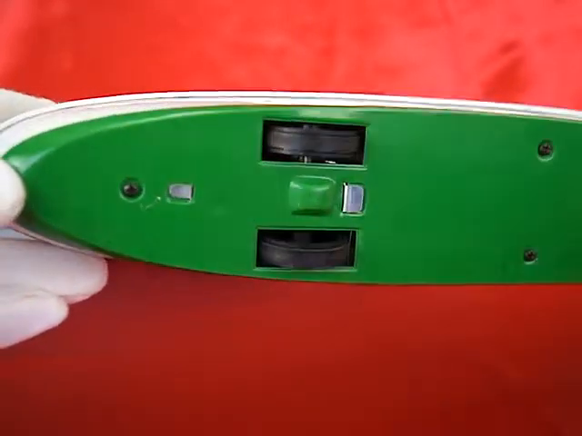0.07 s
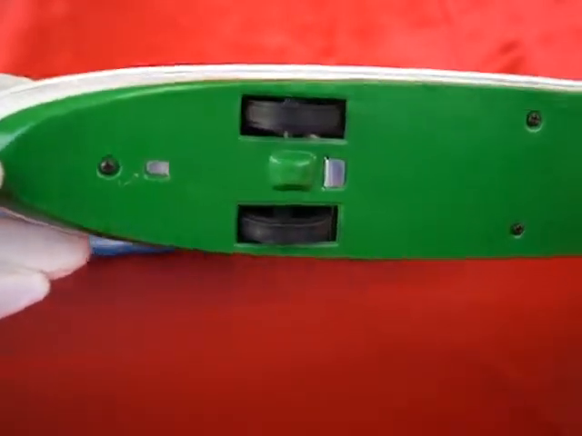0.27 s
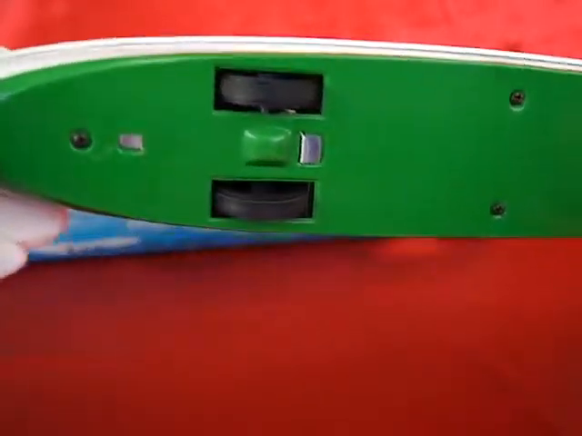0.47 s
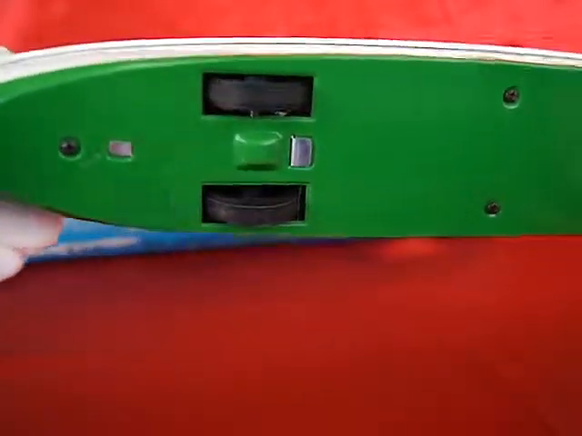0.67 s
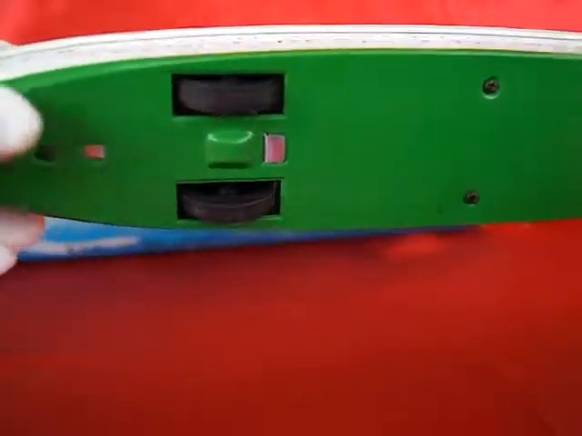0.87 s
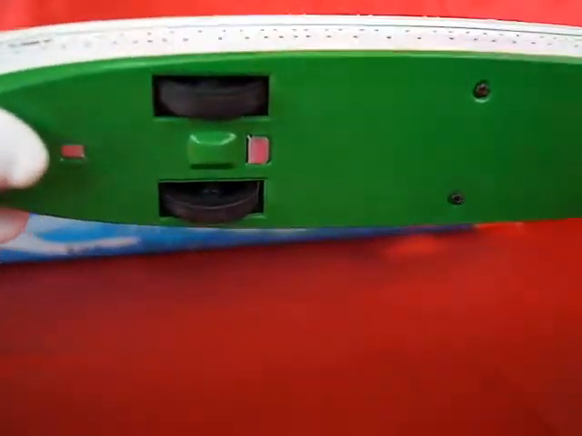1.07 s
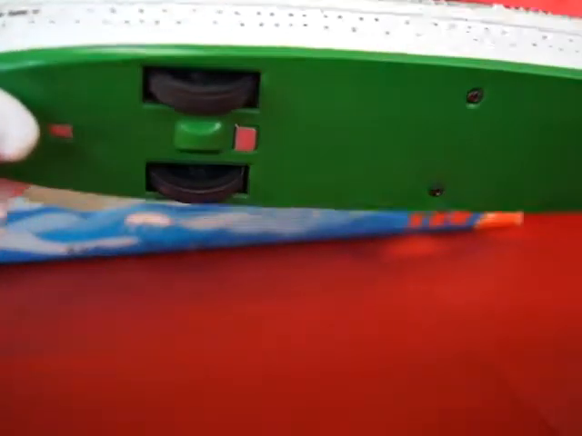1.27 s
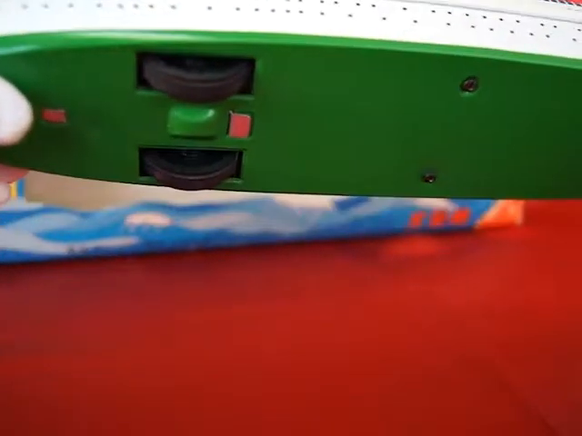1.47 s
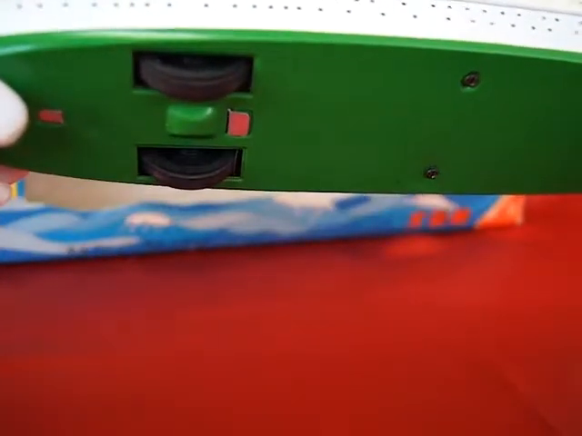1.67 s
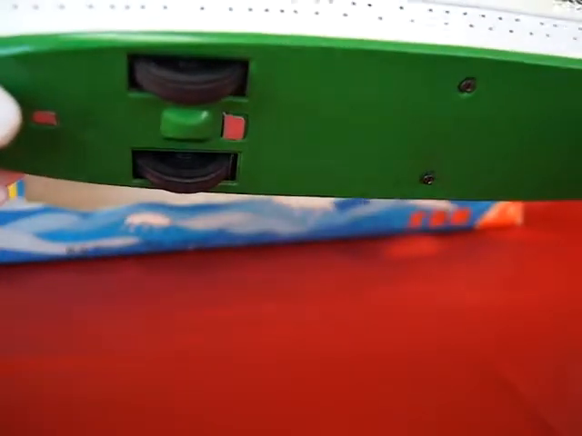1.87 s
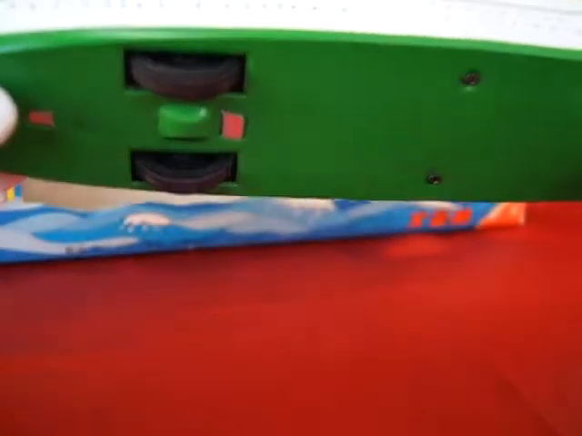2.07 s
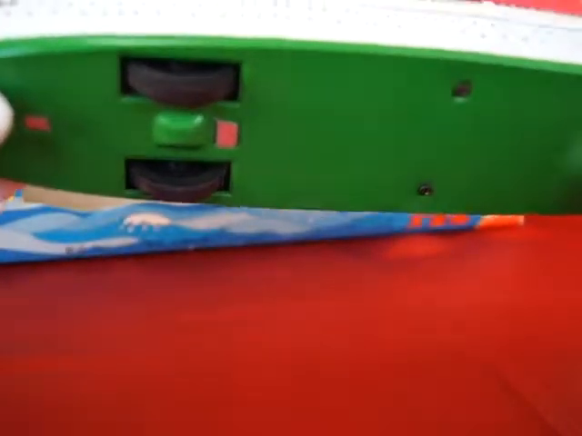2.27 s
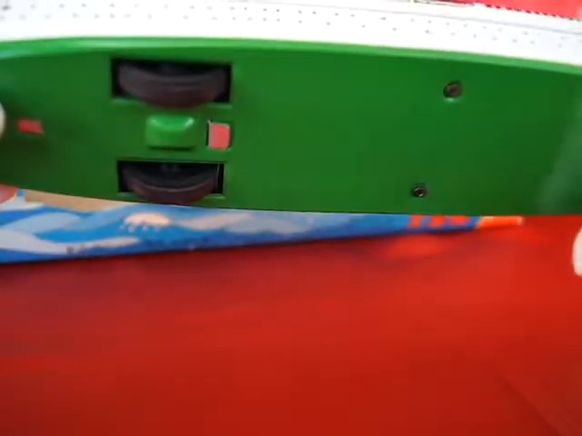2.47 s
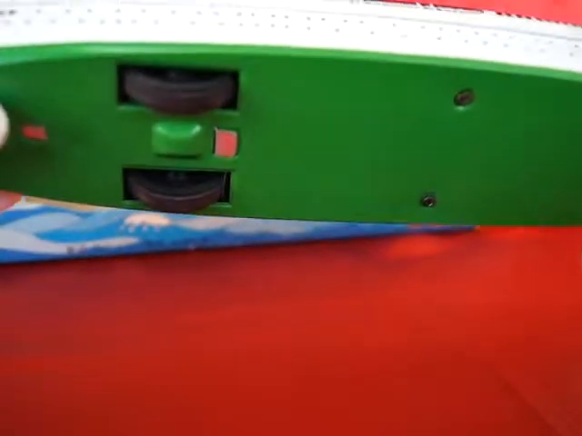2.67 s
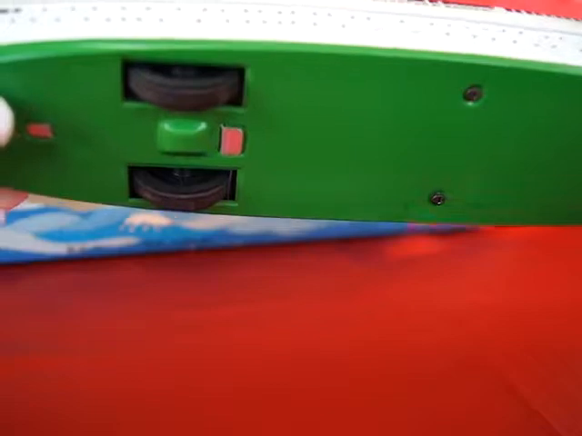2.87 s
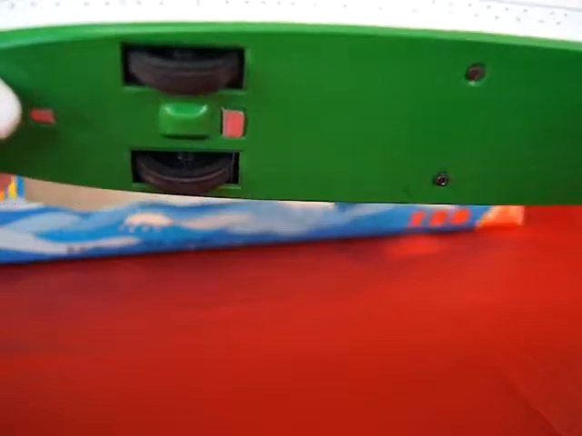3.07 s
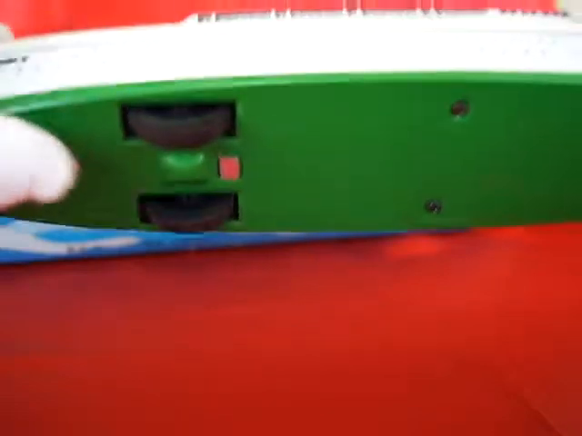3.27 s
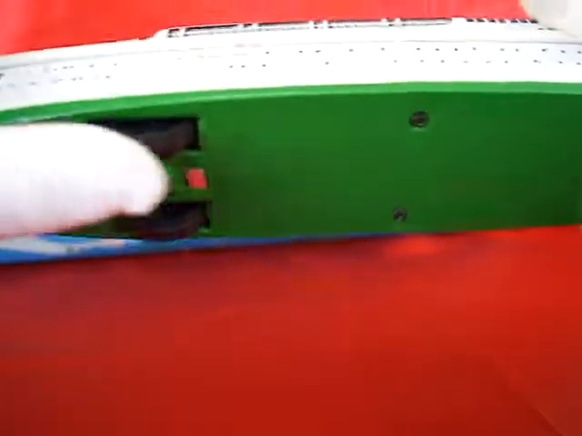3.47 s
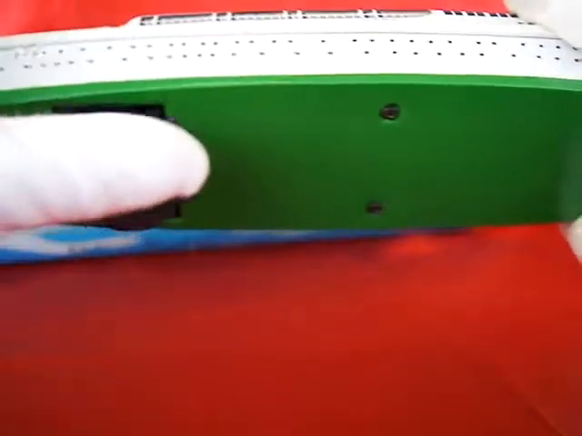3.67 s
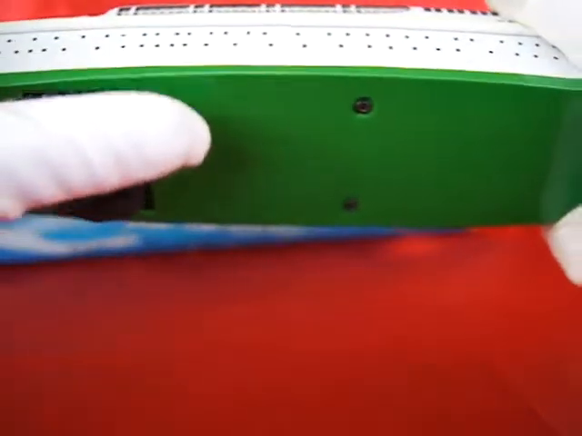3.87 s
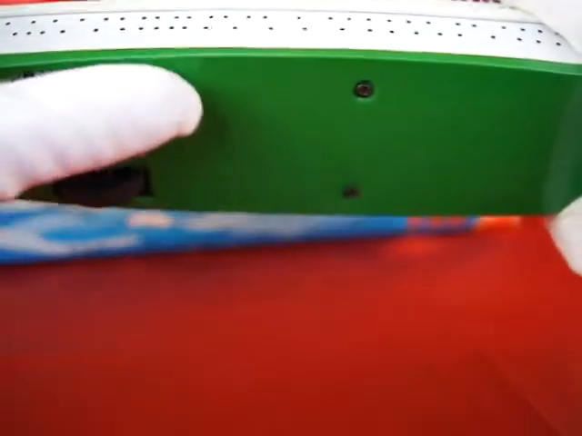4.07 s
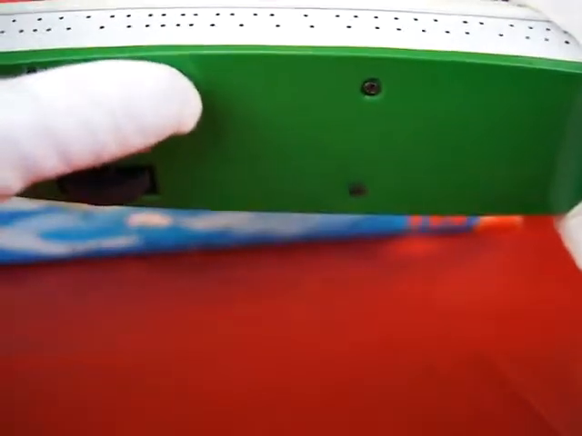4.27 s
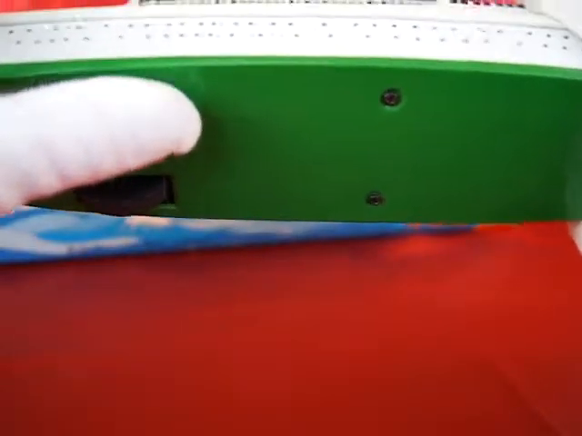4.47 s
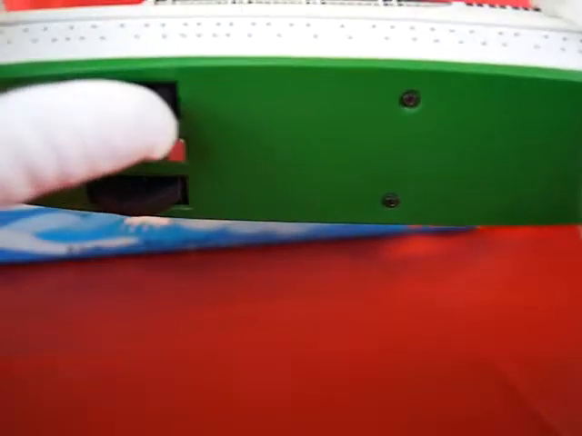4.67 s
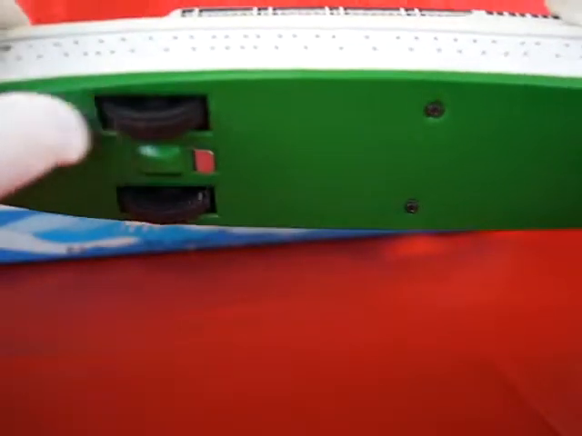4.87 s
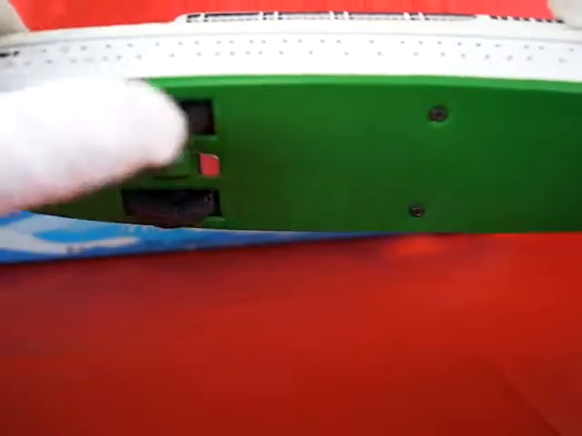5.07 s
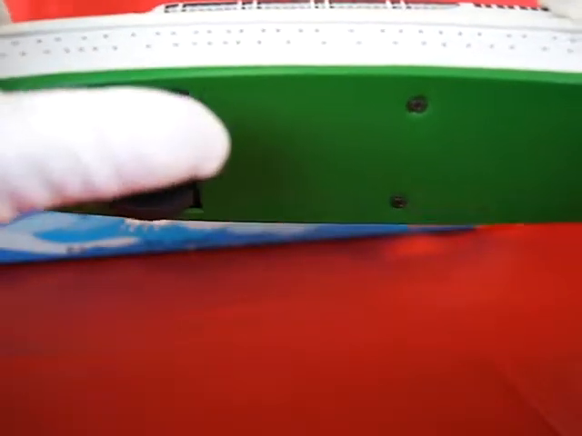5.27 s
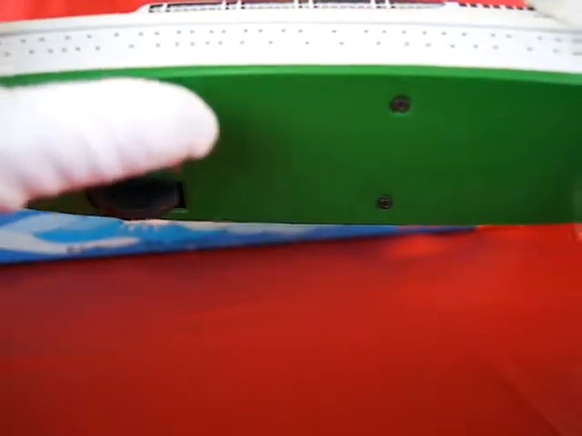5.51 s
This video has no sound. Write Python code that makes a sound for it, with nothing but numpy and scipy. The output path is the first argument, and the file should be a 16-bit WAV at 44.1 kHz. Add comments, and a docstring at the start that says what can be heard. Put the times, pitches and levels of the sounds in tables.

```python
"""A quiet room hush comes first, then soft rubs and light taps as a gloved hand handles a tin toy ship.
The focus motor of a camera close by makes short moves: each starts with a clack, buzzes along and
brakes with a shudder. Then a finger drives the wheels: gear teeth and loose shafts hammer the thin
hull into a loud whirr. Random small contacts shake sets of resonances, and short noise tails add the ringing."""
import sys
import numpy as np
from scipy import signal
from scipy.fft import rfft, irfft
from scipy.io import wavfile
from scipy.ndimage import uniform_filter1d

SR = 44100
rng = np.random.default_rng(int(sys.argv[2]) if len(sys.argv) > 2 else 0)


def dump(signal):
    """Clip the signal to [-1, 1] and save it as 16-bit WAV at the path in sys.argv[1]."""
    limited = np.clip(np.atleast_2d(signal).T, -1, 1)
    pcm = np.round(limited * 32767).astype(np.int16)
    wavfile.write(sys.argv[1], SR, pcm)


N = 244314
TIME = np.arange(N) / SR  # seconds


# Resonances of the tin hull, also used by taps and glove: f/Hz, width/Hz, relative level/dB
HULL_MODES = [(249, 59, -29.5), (408, 11, -15), (471, 36, -17.5), (569, 55, -15), (704, 19, 0),
              (734.3, 21, -5.5), (759.8, 21.7, -1.5), (795, 8.9, -3), (1040, 17, -30), (1075, 11, -9.5),
              (1207.4, 28.6, -7.5), (1615, 126, -19.5), (1745, 180, -14), (1827, 64, -23.5),
              (2070, 210, -19.5), (2604, 74, -5.5), (2950, 100, -13.5), (3200, 146, -16), (3858, 217, -13),
              (4174, 170, -14.5), (4600, 93, -18.5), (4950, 330, -19), (5500, 590, -22.5), (6470, 270, -23),
              (7550, 630, -29), (9100, 670, -33)]
# How alike left and right are for the toy: f/Hz, correlation (-1 to 1)
TOY_LIKENESS = [(200, 0.92), (750, 0.99), (1100, .88), (2000, .7), (2700, .7), (3500, .25), (6000, .1),
                (9000, -0.62)]
# The finger's drive, a first push and a stronger second one, before trims and jolts:
# t/s, hull boom level/dB, gear rattle level/dB
DRIVE_LEVELS = [(4.35, -49, -55), (4.362, -46.5, -50), (4.534, -33, -39), (4.594, -34, -40),
                (4.628, -34, -31), (4.716, -24, -27), (4.806, -29.5, -30), (4.972, -20, -23),
                (5.4, -22, -24), (5.54, -37, -36)]
# The gear train catches and jolts: t/s, extra level/dB
GEAR_JOLTS = [(4.37, 8.5), (4.477, 4.5), (4.957, 3), (5.15, 4), (5.508, 7.5)]


def friction_motor():
    """Meshing teeth and loose shafts hammer the hull; the harder the drive, the faster and brighter."""
    full_teeth_per_s, full_rattles_per_s, full_axle_hz = 950, 7000, 26  # at the hardest drive
    wobble_db, uneven_db, grain_db = 0.5, 1.0, 4.6
    boom_trim_db, gear_trim_db = -0.5, 2.5
    jolt_s, jolt_rattle_share = 0.025, 0.82  # the boom takes all of a jolt's dB, the rattle this share
    spin_up_s = 0.015  # fade-in that ends at the first row of the drive
    split_hz = 1305  # boom below, gear rattle above

    t, boom, rattle = np.transpose(DRIVE_LEVELS)
    boom_db, rattle_db = np.interp(TIME, t, boom), np.interp(TIME, t, rattle)
    effort_db = rattle_db - rattle_db.max()
    engaged = np.clip(1 + (TIME - t[0]) / spin_up_s, 0, 1)
    speed = from_db(0.4 * effort_db) * (engaged > 0)

    teeth = cycles(full_teeth_per_s * speed * (1 + 0.06 * drift(60)))
    loose_shafts = rng.random(N) < full_rattles_per_s * speed / SR
    uneven_hits = from_db(grain_db * np.clip(rng.standard_normal(N), -2, 2))
    force = (teeth + 0.62 * loose_shafts) * uneven_hits
    # an off-centre axle tightens the mesh once a turn
    turns = np.cumsum(full_axle_hz * speed * (1 + 0.1 * drift(18))) / SR
    axle = np.sin(2 * np.pi * turns)
    force = force * from_db(wobble_db * axle + uneven_db * drift(84))

    hull = strike(force, HULL_MODES, TOY_LIKENESS, low_hz=328, high_hz=6800)
    low = cut(hull, split_hz, "low", order=5)
    high = sheet(cut(hull, split_hz, "high", order=5), wet_db=-3.5)
    # soft pushes leave out the top
    dull = cut(high, 3400, "low", order=2)
    bright = cut(high, 17000, "low", order=2)
    hardness = from_db(0.85 * effort_db)
    high = (1 - hardness) * dull + hardness * bright

    jolt_db = sum(db * swell(at, jolt_s) for at, db in GEAR_JOLTS)
    boom_sound = from_db(boom_db + boom_trim_db + jolt_db) * steady(low)
    rattle_sound = from_db(rattle_db + gear_trim_db + jolt_rattle_share * jolt_db) * steady(high)
    return engaged * (boom_sound + rattle_sound)


# Fingers on the hull: t/s, nominal peak level/dB before the ringing is added, contact cut-off f/Hz
FINGER_TAPS = [(0.566, -33, 11600), (0.568, -36.5, 900), (0.868, -38.5, 875), (0.961, -44, 850),
               (2.739, -37.5, 1250), (2.802, -48, 1090), (3.9255, -20.5, 13000)]


def taps():
    """A finger knocks the hull and damps it, and the thin sheet rings briefly."""
    knocks = blows(FINGER_TAPS, HULL_MODES, TOY_LIKENESS, chatter_s=0.0048, crest_db=11.0,
                   damping_hz=42, low_hz=540)
    return sheet(knocks, wet_db=-4)


# The glove slides on the tin: t/s at the middle, length/s, level/dB at the middle, before the room
GLOVE_RUBS = [(0.247, 0.049, -63), (0.533, 0.074, -56.5), (1.27, 0.089, -64.5), (1.526, 0.1, -59.5),
              (2.527, 0.11, -58.5)]


def glove():
    """Cloth catches on the tin in many tiny slips."""
    slips = (rng.random(N) < 3000 / SR) * rng.standard_normal(N)
    hiss = rms_one(strike(slips, HULL_MODES, TOY_LIKENESS, low_hz=624, high_hz=2220))
    return hiss * sum(from_db(db) * swell(t, length) for t, length, db in GLOVE_RUBS)


# Resonances of the lens drive: f/Hz, width/Hz, relative level/dB
LENS_MODES = [(410, 190, -12), (810, 75, -11), (1054, 77, -5), (1800, 570, -16), (2708, 92, -2.5),
              (3005, 97, 0.5), (3880, 100, -8), (4100, 160, -6.5), (4670, 100, -17.5), (7600, 1500, -26.5)]
# Resonances of the lens barrel: f/Hz, width/Hz, relative level/dB
BARREL_MODES = [(262, 87, -2.5), (330, 84, -11), (478, 120, 1), (491, 52, 6.5), (1020, 210, 5.5)]
# How alike left and right are for the lens: f/Hz, correlation (-1 to 1)
LENS_LIKENESS = [(300, .1), (1200, 0.32), (2700, -0.23), (4000, 0.23), (6000, 0.26)]
# Moves of the lens, also used by lens_knocks; levels before later trims:
# start t/s, brake t/s, knock level/dB, buzz level/dB, brake level/dB
LENS_MOVES = [(1.9488, 2.119, -17, -55, -44), (2.149, 2.161, -24.5, -53, -46.5),
              (2.355, 2.408, -42.5, -57.5, -50), (2.43, 2.445, -50, -54, -47.5),
              (3.492, 3.546, -33.5, -56, -49.5), (3.641, 3.875, -34, -56, -45.5),
              (4.002, 4.047, -16.5, -53, -44.5), (4.191, 4.404, -34.5, -54.5, -49)]


def focus_motor():
    """Every step shakes the lens drive with a small burst of contacts; braking shakes the barrel too."""
    step_hz, step_decay = 203, 1.0  # the decay is counted in steps
    thump_db, groan_db, strain_db = -7.0, -6, -2.0
    surge_db, surge_s = 9.5, 0.056  # the motor strains as it starts, then settles
    brake_s = 0.02  # it strains this long before it stands still
    shudder_s, barrel_lag_s = 0.045, 0.01594  # the shudder peaks this long after the brake catches

    burst = np.exp(-(TIME * step_hz % 1) / step_decay)
    force = burst * (rng.random(N) < 14000 / SR)
    buzz = steady(strike(force, LENS_MODES, LENS_LIKENESS, low_hz=246, high_hz=6000))
    thump = steady(strike(force, BARREL_MODES, LENS_LIKENESS, low_hz=170, high_hz=910))
    effort = shake = 0
    for start, brake, _, buzz_db, brake_db in LENS_MOVES:
        extra_db = surge_db * np.exp(-abs(TIME - start) / surge_s)
        running = (TIME > start) & (TIME <= brake)
        braking = (TIME > brake) & (TIME < brake + brake_s)
        effort = effort + from_db(buzz_db + extra_db) * running + from_db(brake_db + strain_db) * braking
        peak = brake + barrel_lag_s
        barrel = from_db(thump_db) * thump * swell(peak, shudder_s)
        shudder = barrel + from_db(groan_db) * groan(peak, shudder_s)
        shake = shake + from_db(brake_db) * shudder
    # the effort cannot jump at once
    return buzz * cut(effort, 52, "low", order=1) + shake


def groan(middle, length, hz=470, octaves_per_s=17):
    """The braking motor sounds a short, rough, falling note that passes hz on average at its middle."""
    glide = 2 ** (-octaves_per_s * np.clip(TIME - middle, -length, length))
    rough_hz = hz * glide * (1 + 0.14 * drift(197.0))
    phase = 2 * np.pi * np.cumsum(rough_hz) / SR
    # the right channel is shifted by 1.2 radians
    return np.sqrt(2) * np.sin(phase + [[0], [1.2]]) * swell(middle, length)


# Resonances of the lens drive's stops, before damping: f/Hz, width/Hz, relative level/dB
STOP_MODES = [(808, 220, -2), (1150, 220, -6), (1617, 80, 0.5), (2020, 790, -1.5), (2590, 290, 0.5),
              (4210, 510, -4), (4960, 2100, -17), (8400, 2000, -12)]


def lens_knocks():
    """The lens knocks as it starts and ticks as it brakes; a hard start first rattles twice through the slack."""
    knock_hz, hard_knock_db = 4200, -29
    catch_db, catch_hz = 6.5, 5500  # brake tick: level over the brake level, contact cut-off
    slack_s, slack_db, slack_loss_db, slack_hz = 0.0041, -33, 4.5, 10000  # the earlier tick is weaker
    rows = []
    for start, brake, knock_db, _, brake_db in LENS_MOVES:
        rows.append((start, knock_db, knock_hz))
        rows.append((brake, brake_db + catch_db, catch_hz))
        if knock_db > hard_knock_db:
            rows.append((start - slack_s, slack_db, slack_hz))
            rows.append((start - 2 * slack_s, slack_db - slack_loss_db, slack_hz))
    return blows(rows, STOP_MODES, LENS_LIKENESS, chatter_s=0.0039, crest_db=12.0,
                 damping_hz=5.6, low_hz=313)


def sheet(x, wet_db):
    """The thin tin has many close upper modes that ring briefly."""
    spectrum = [(700, -19), (1500, 0.0), (3000, -2), (6000, 3.0)]  # f/Hz, level/dB
    return ring_on(x, spectrum, TOY_LIKENESS, t60=0.085, wet_db=wet_db)


def camera_case(x):
    """The camera's case rings a little after the lens."""
    spectrum = [(400, -5), (1200, -17), (4000, -26), (12000, -18.5)]  # f/Hz, level/dB
    return ring_on(x, spectrum, LENS_LIKENESS, t60=0.14, wet_db=-12)


def room(x):
    """A short, slightly dull tail from the near walls."""
    spectrum = [(300, 5.5), (3000, 0.5), (12000, -11.5)]  # f/Hz, level/dB
    return ring_on(x, spectrum, TOY_LIKENESS, t60=0.31, wet_db=-16.5)


# Colour of the room noise: f/Hz, relative level/dB per Hz
HUSH_SPECTRUM = [(25, -3), (70, -14.5), (130, -22.5), (200, -11.5), (330, -4.5), (500, -3.5), (615, -12),
                 (750, -1), (1150, -3.5), (1800, -7.5), (2800, -7.5), (3500, -13.5), (4400, -8),
                 (7000, -16.5), (14000, -26.5)]
# How alike left and right are for the room noise: f/Hz, correlation (-1 to 1)
HUSH_LIKENESS = [(100, 0.98), (400, 0.18), (1500, 0.2), (6000, 0.051)]


def room_hush(level_db=-60):
    """Steady coloured noise, without the deepest bass, fills the quiet room."""
    noise = stereo_noise(HUSH_SPECTRUM, HUSH_LIKENESS, N)
    return from_db(level_db) * rms_one(cut(noise, 24, "high", order=4))


# A faint low hum comes and goes: t/s at the middle, length/s, level/dB at the middle
HUM_SWELLS = [(0.827, 0.79, -73.5), (1.75, 0.68, -69.5)]


def hum(hz=345, width=45):
    """A narrow, wavering band far in the background: noise through one resonance twice."""
    once = resonate(rng.standard_normal(N), hz, width)
    tone = rms_one(resonate(once, hz, width))
    return tone * sum(from_db(db) * swell(t, length) for t, length, db in HUM_SWELLS)


def strike(force, modes, likeness, low_hz, high_hz):
    """Each contact lands somewhere else, so it pushes each mode, in each channel, with its own sign."""
    at, out = np.flatnonzero(force), 0
    for hz, width, db in modes:
        left = force[at] * rng.choice([-1, 1], len(at))
        same = rng.random(len(at)) < (1 + at_hz(likeness, hz)) / 2
        push = np.zeros((2, len(force)))
        push[:, at] = left, np.where(same, left, -left)
        out = out + from_db(db) * resonate(push, hz, width)
    # a small body radiates little bass, and contacts are never perfectly sharp
    return cut(cut(out, low_hz, "high", order=3), high_hz, "low", order=1)


def blows(rows, modes, likeness, chatter_s, crest_db, damping_hz, low_hz):
    """Single knocks: a first contact and a quickly dying chatter; what strikes also damps the modes."""
    out, size = np.zeros((2, N)), SR // 5
    t = np.arange(size) / SR
    # a damped mode is wider and weaker
    damped = [(hz, width + damping_hz, db - 20 * np.log10(1 + damping_hz / width))
              for hz, width, db in modes]
    for at, db, contact_hz in rows:
        force = (rng.random(size) < 9000 / SR) * np.exp(-t / chatter_s)
        force[0] = 1
        sound = strike(force, damped, likeness, low_hz=low_hz, high_hz=11900)
        # a soft contact leaves out the treble
        sound = cut(sound, contact_hz, "low", order=2)
        start = round(at * SR)
        # the first 10 ms sit crest_db below the nominal peak
        out[:, start:start + size] += sound * from_db(db - crest_db) / np.std(sound[:, t < 0.01])
    return out


def ring_on(x, spectrum, likeness, t60, wet_db):
    """Add a dense tail, countless weak modes or echoes, that dies by 60 dB in t60 seconds."""
    size = SR // 2
    t = np.arange(size) / SR
    tail = stereo_noise(spectrum, likeness, size) * from_db(-60 * t / t60) * (t > 0.001)
    tail = tail / np.sqrt(np.sum(tail ** 2) / 2)
    return x + from_db(wet_db) * signal.fftconvolve(x, tail, axes=1)[:, :N]


def stereo_noise(spectrum, likeness, size):
    """Coloured noise in two partly alike channels; rms 1."""
    hz = np.arange(size // 2 + 1) * SR / size
    mid, side = rfft(rng.standard_normal((2, size))) * from_db(at_hz(spectrum, hz))
    alike = np.clip(at_hz(likeness, hz), -1, 1)
    both = np.sqrt(1 + alike) * mid + np.sqrt(1 - alike) * side * [[1], [-1]]
    return rms_one(irfft(both, size))


def resonate(x, hz, width):
    """One resonance with gain 1 on top."""
    r = np.exp(-np.pi * width / SR)
    top = np.array([1, 0, -1]) * (1 - r * r) / 2
    bottom = [1, -2 * r * np.cos(2 * np.pi * hz / SR), r * r]
    return signal.lfilter(top, bottom, x + 1e-18)


def cut(x, hz, kind, order):
    """Butterworth low- or high-pass."""
    sos = signal.butter(order, min(hz, 0.45 * SR), kind, fs=SR, output="sos")
    return signal.sosfilt(sos, x + 1e-18)


def steady(x):
    """Even out the slow level, keeping the fast flutter."""
    power = uniform_filter1d(np.mean(x ** 2, axis=0), SR // 25)
    return x / np.sqrt(np.maximum(power, 0) + 1e-6 * power.max())


def swell(middle, length):
    """A smooth rise and fall centred on a time in seconds."""
    return np.cos(np.pi * np.clip((TIME - middle) / length, -0.5, 0.5)) ** 2


def drift(rate_hz):
    """Slow chance with spread 1."""
    return rms_one(cut(rng.standard_normal(N), rate_hz, "low", order=2))


def cycles(per_s):
    """One unit click for each cycle of a changing rate."""
    return np.diff(np.floor(np.cumsum(per_s) / SR), prepend=0)


def at_hz(points, hz):
    """Read a table on a log-frequency axis."""
    f, value = np.transpose(points)
    return np.interp(np.log(np.maximum(hz, 1)), np.log(f), value)


def rms_one(x):
    """Scale to unit rms."""
    return x / np.sqrt(np.mean(x ** 2) + 1e-20)


def from_db(db):
    """Decibels to gain."""
    return 10 ** (np.asarray(db) / 20)


def scene():
    """The toy in the room, the lens inside the camera, a quiet hush and a faint hum."""
    # the toy is slightly louder on the right
    toy = room(friction_motor() + taps() + glove()) * from_db([[-0.3], [0.3]])
    lens = camera_case(focus_motor() + lens_knocks())
    return toy + from_db(2.5) * lens + room_hush() + hum()


# Dips in the microphone's response: f/Hz, width/Hz, level/dB at the centre of each dip alone
MICROPHONE_DIPS = [(114, 39, -0.5), (1364, 400, -10), (2366, 350, -29)]


def record(dry):
    """The microphone has a few dips; the top is cut; the converter sits slightly off zero."""
    for hz, width, db in MICROPHONE_DIPS:
        dry = dry - (1 - from_db(db)) * resonate(dry, hz, width)
    # a very steep low-pass at 14050 Hz
    top_cut = signal.ellip(12, 0.1, 80, 14050, fs=SR, output="sos")
    return signal.sosfilt(top_cut, dry) - 0.0025


dry = scene()
out = record(dry)
dump(out)
```